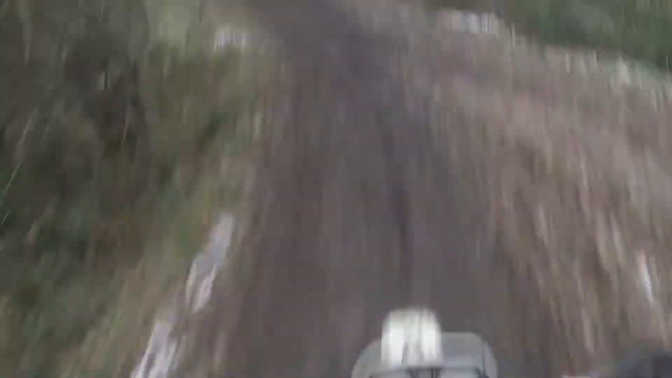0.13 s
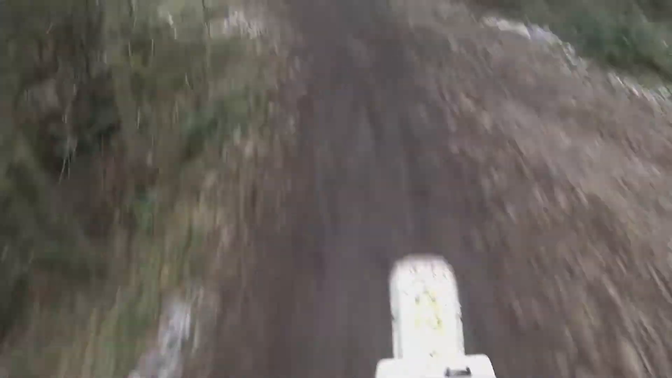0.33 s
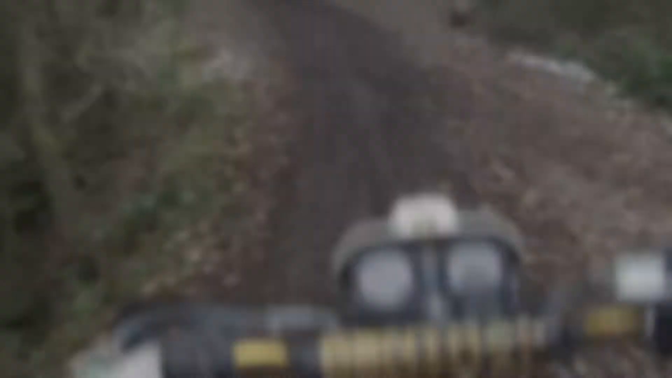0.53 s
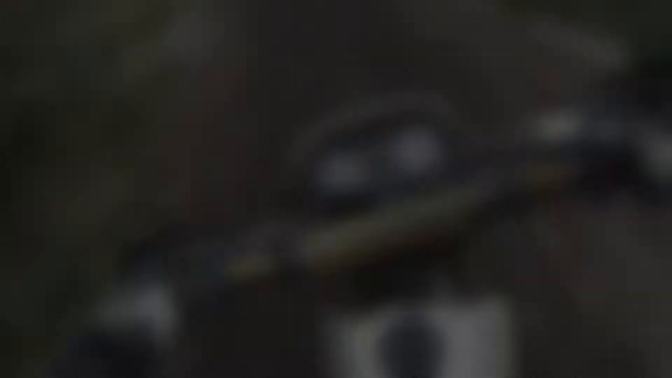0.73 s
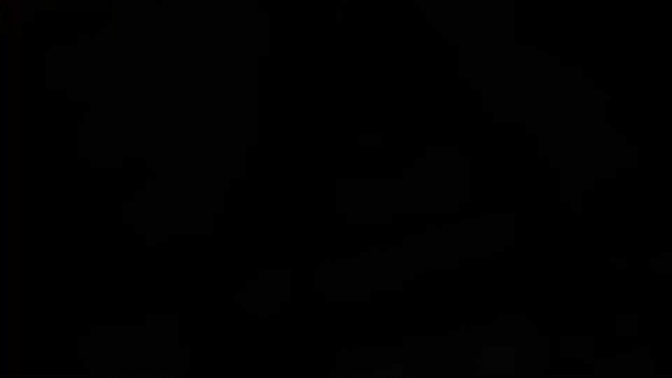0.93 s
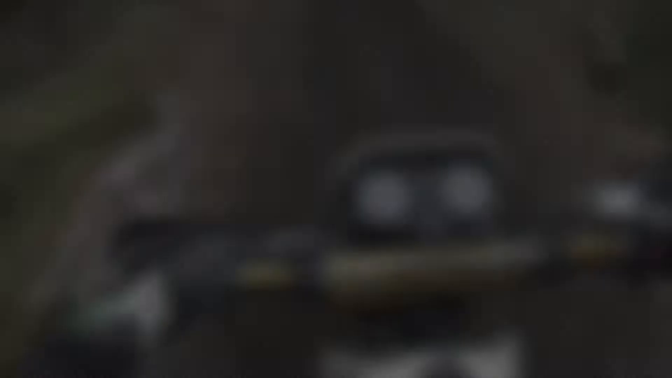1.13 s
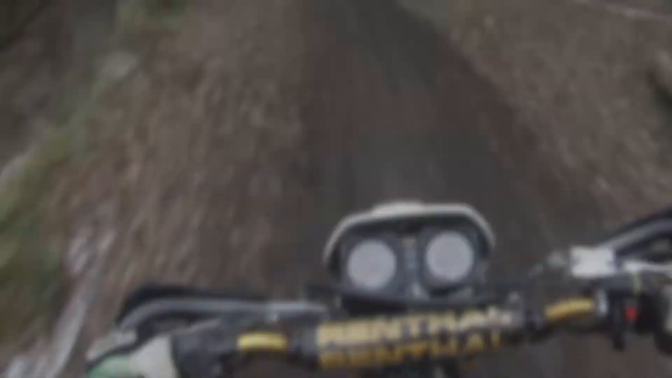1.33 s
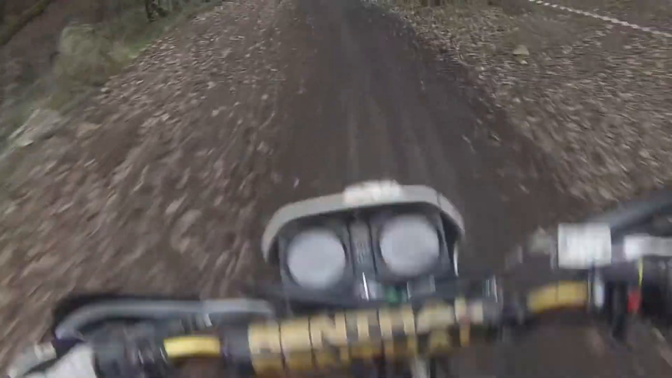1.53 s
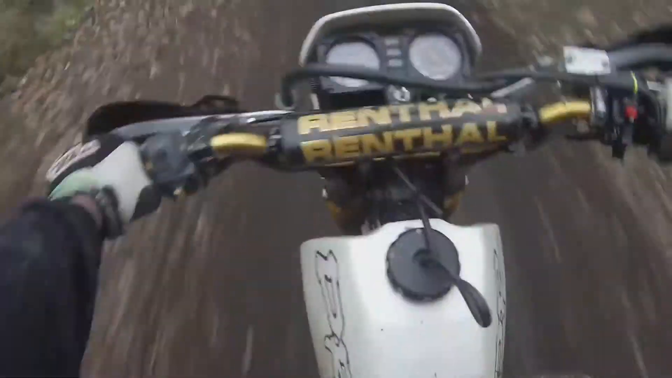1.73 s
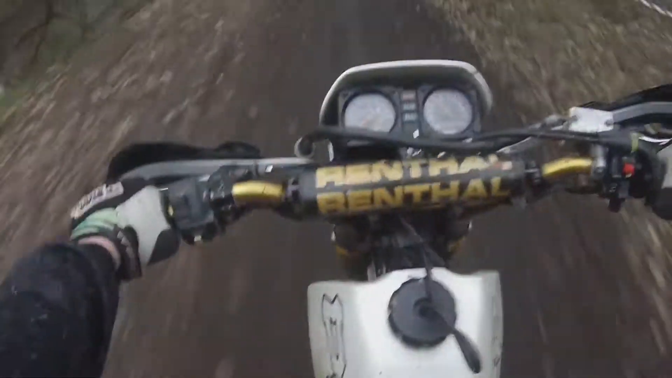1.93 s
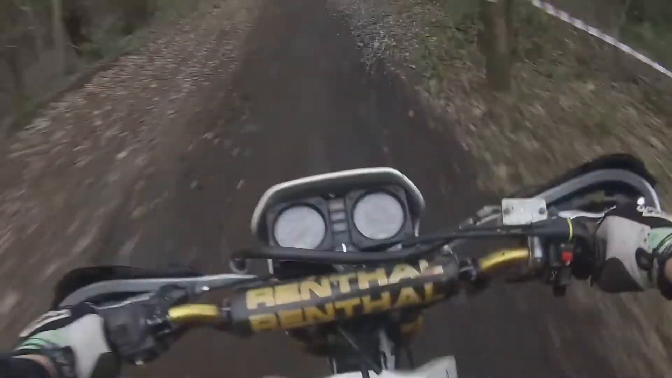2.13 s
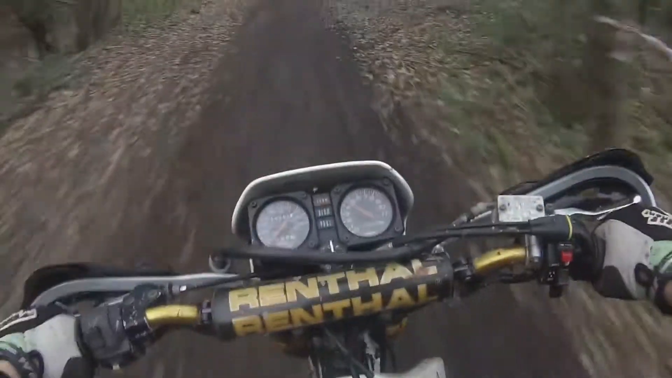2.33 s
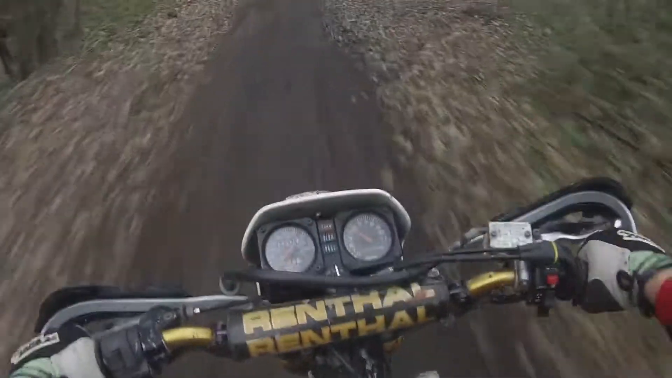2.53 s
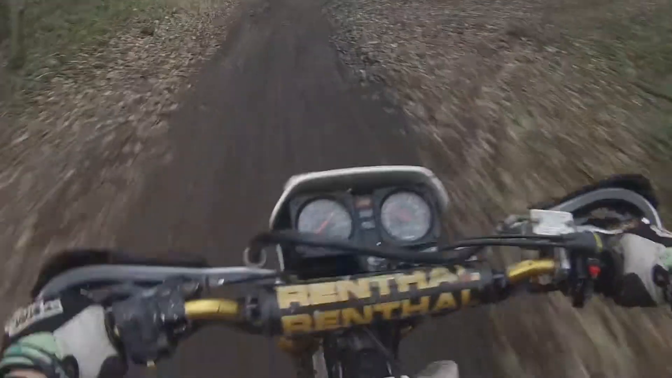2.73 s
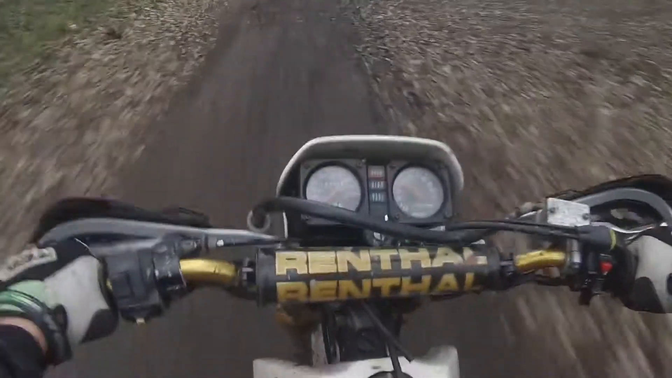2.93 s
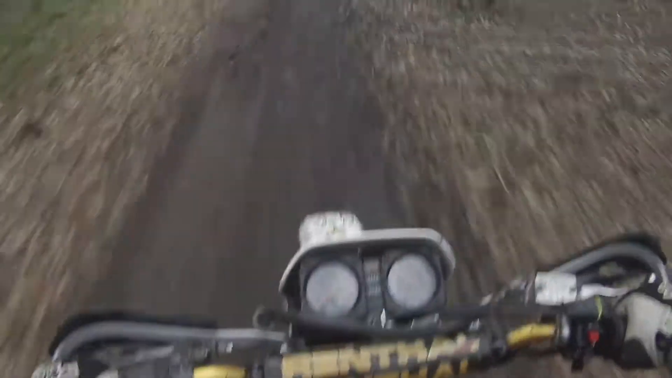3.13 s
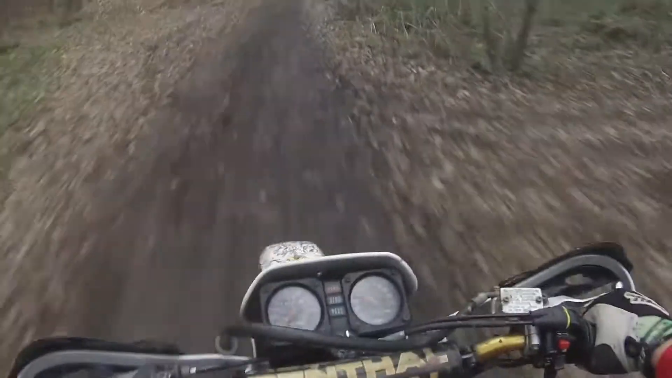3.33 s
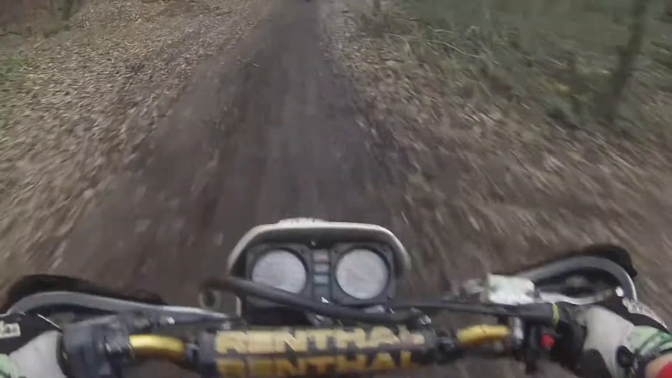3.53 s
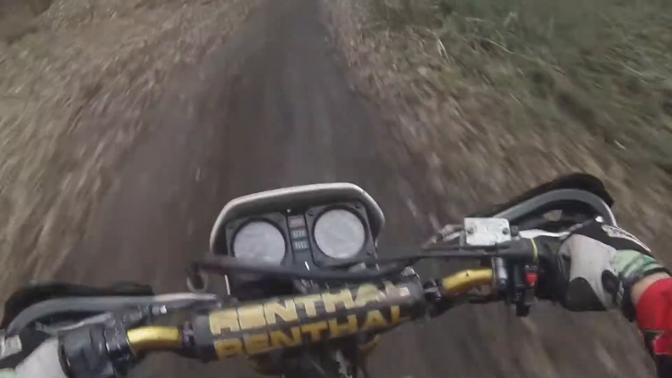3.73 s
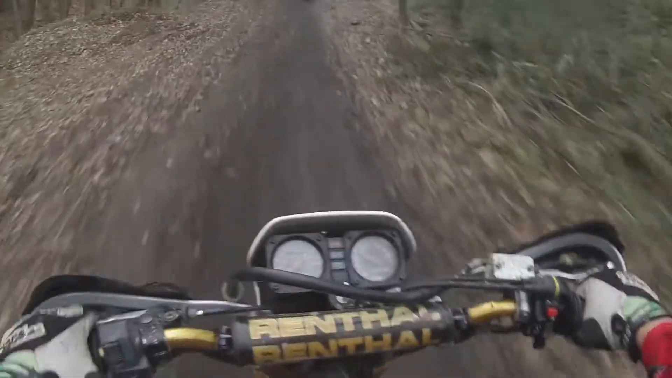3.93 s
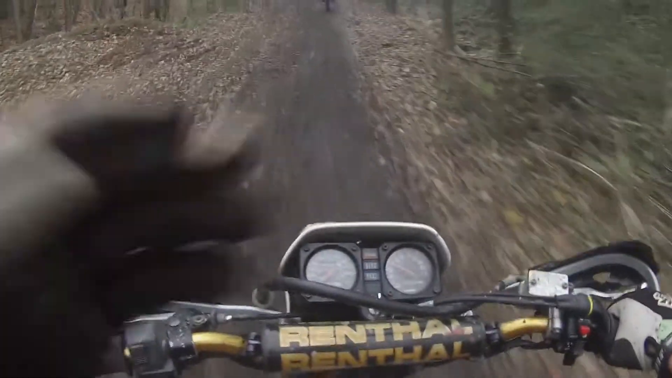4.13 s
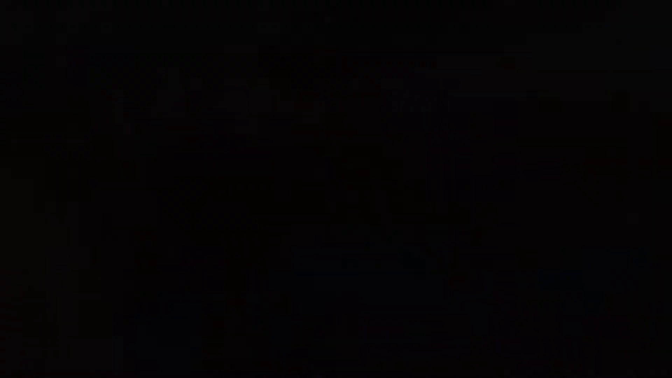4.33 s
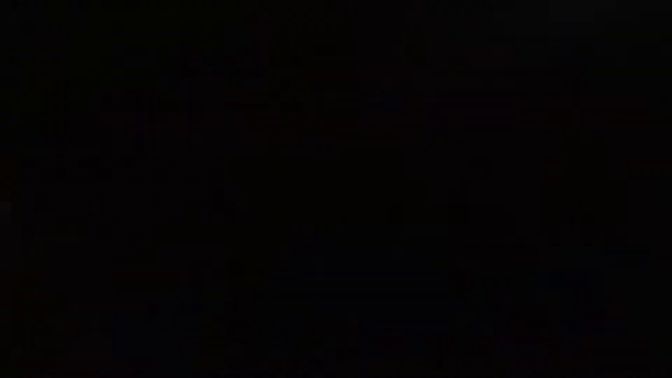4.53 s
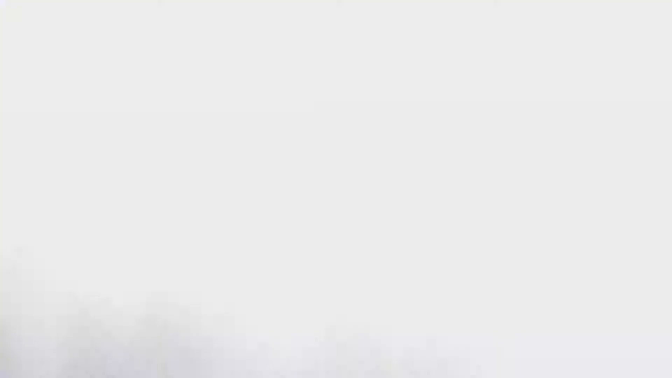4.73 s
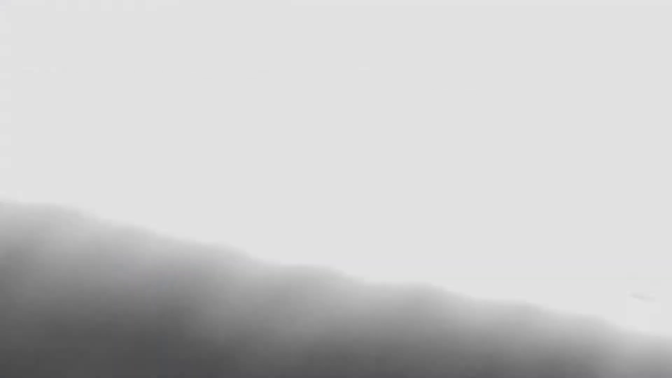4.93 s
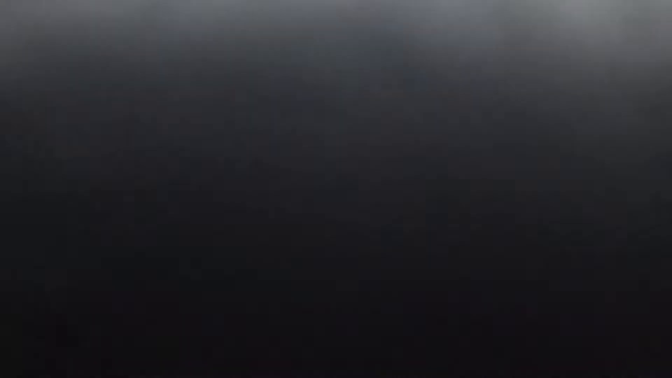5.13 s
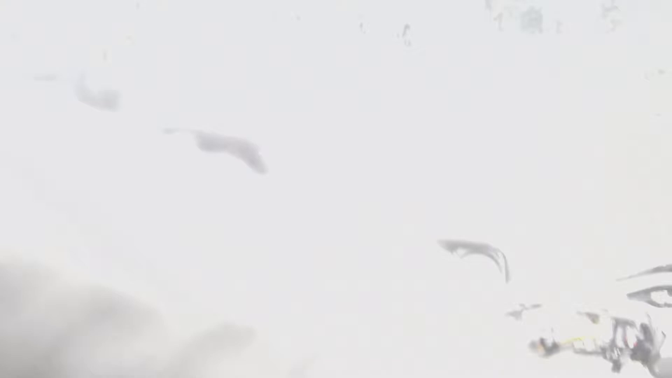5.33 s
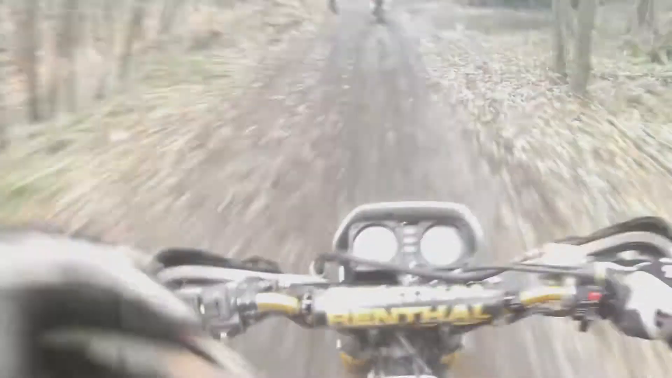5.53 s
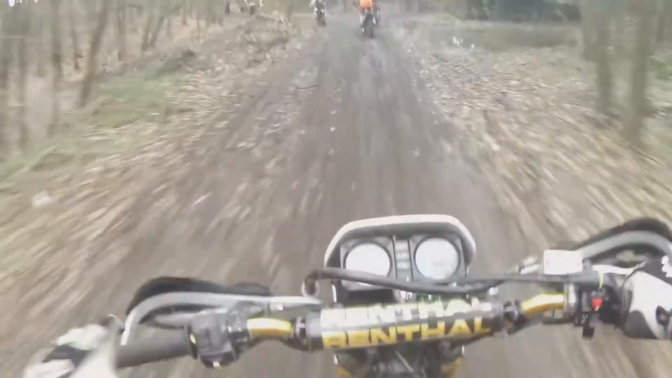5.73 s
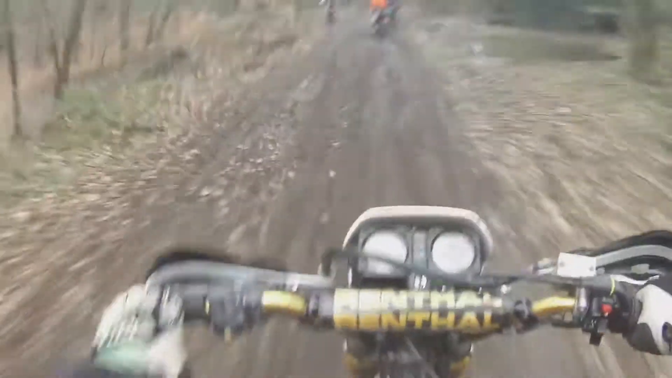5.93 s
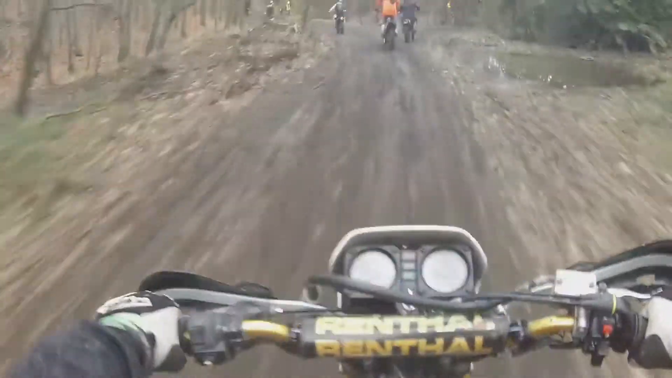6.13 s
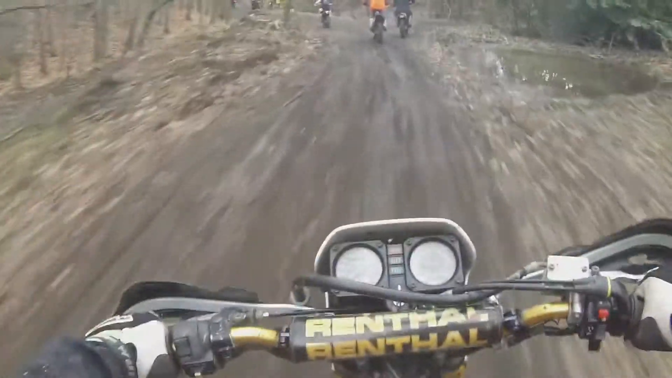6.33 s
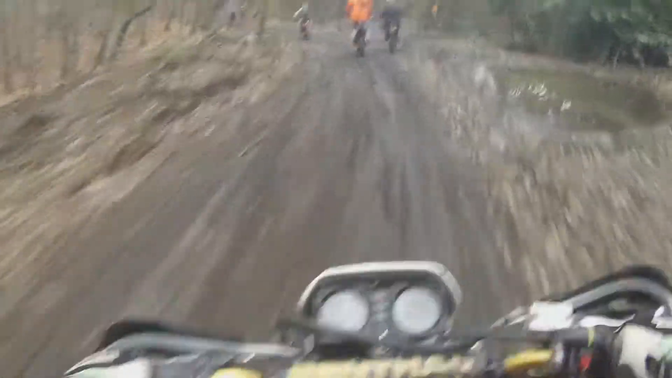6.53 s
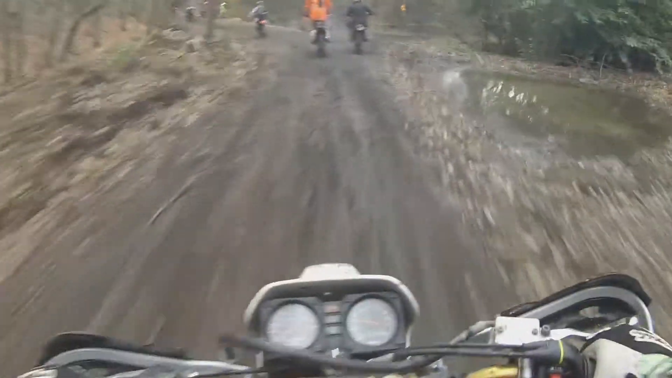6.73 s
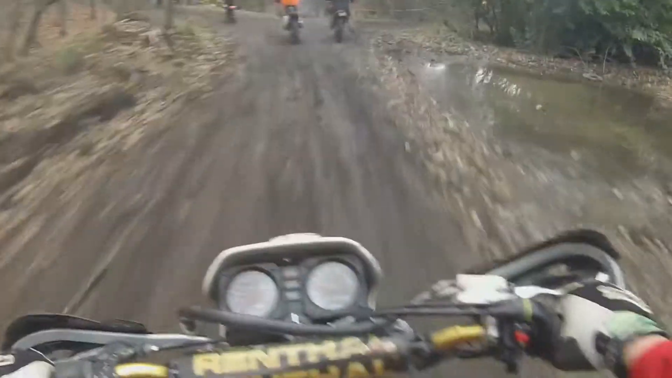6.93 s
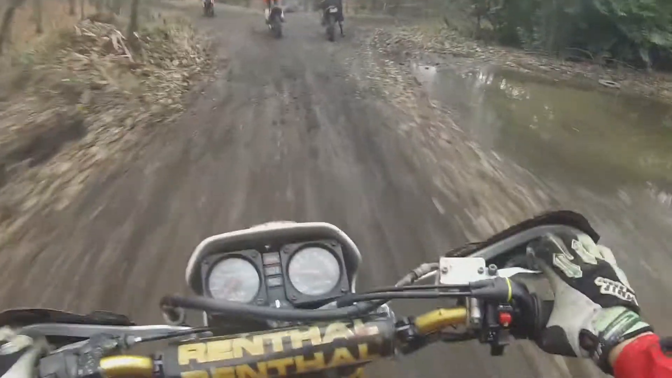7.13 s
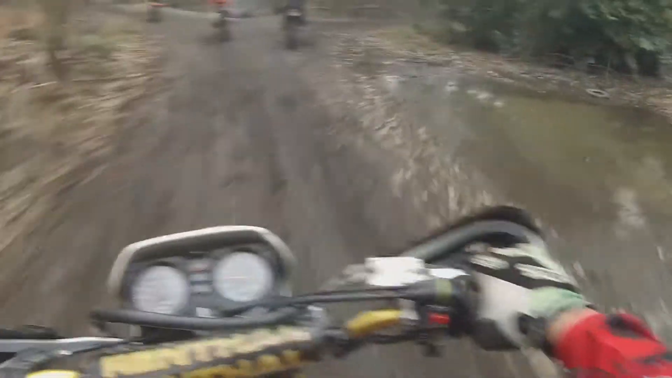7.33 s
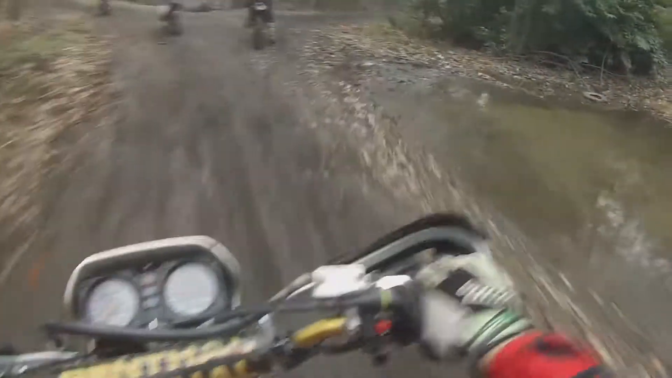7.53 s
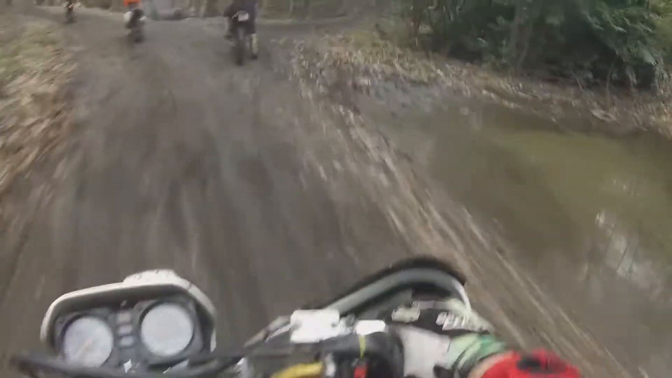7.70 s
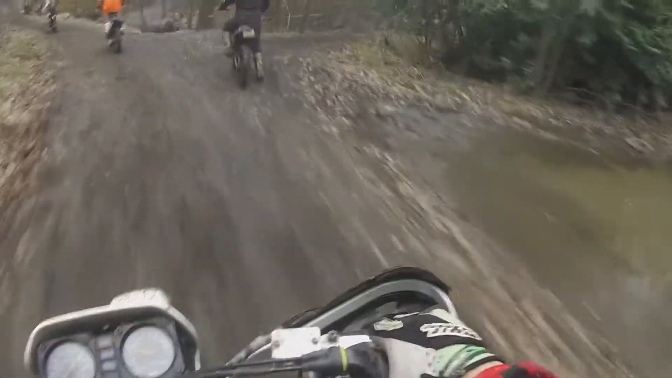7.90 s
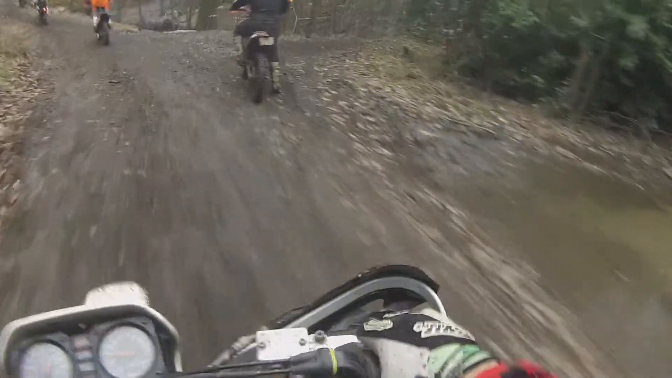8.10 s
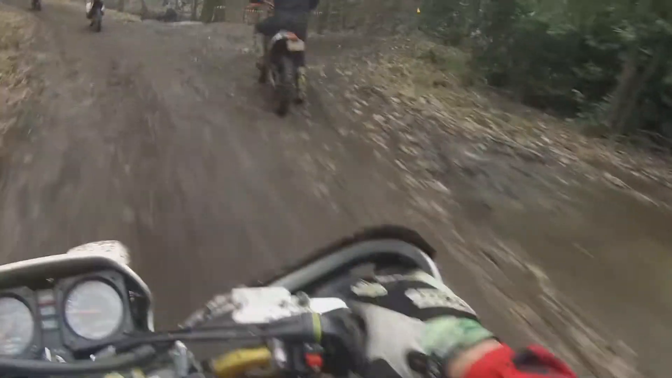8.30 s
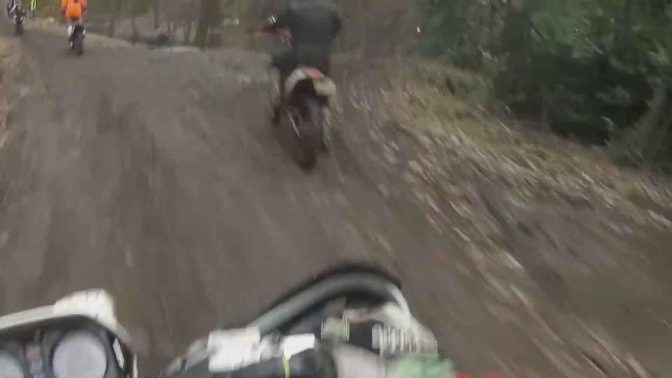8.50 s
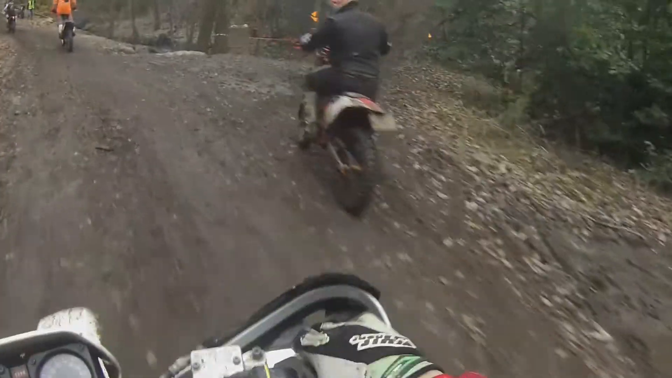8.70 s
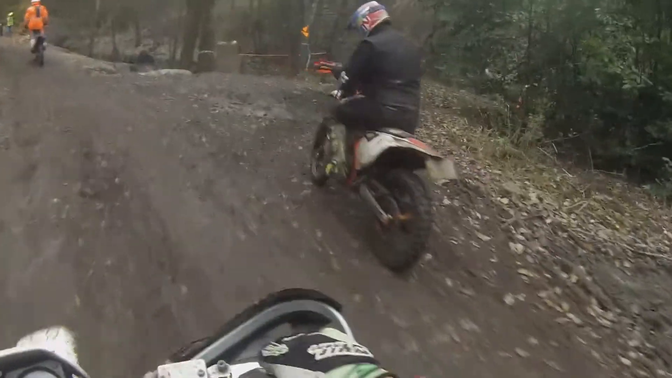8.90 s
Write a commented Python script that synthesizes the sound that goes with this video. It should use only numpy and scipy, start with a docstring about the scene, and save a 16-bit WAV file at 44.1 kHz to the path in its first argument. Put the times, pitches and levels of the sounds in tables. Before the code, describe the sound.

A rider-worn microphone on a woodland dirt track picks up a single-cylinder four-stroke trail bike close by. From 0 to 2.6 s the throttle opens in repeated bursts with a booming exhaust and barking intake, revs peaking around 1.6 s before dropping. Metallic ringing and valve clatter continue throughout, over gritty tyre hiss, low wind buffets, dry high chain chirps and occasional stone ticks, a clearer one near 2.75 s. From 2.6 s it coasts steadily. At about 4.33 and 4.42 s hard, near-overloading knocks strike the microphone housing, then cloth scrapes and zips across it until 5.5 s, with smaller bumps. A light throttle holds from 5 to 6.1 s, then revs sink until about 7.2 s and recover slightly. From 6.1 s a distant two-stroke drones faintly, rapping unevenly around 8 s; from 8.4 s a nearer one accelerates with a loud, rising, nasal rasp to the end at about 9 s.

```python
"""A dirt track between trees: a single-cylinder four-stroke trail bike, heard from a camera its rider wears.
The throttle opens in a few bursts, then the bike coasts; firings drive the pipes, knocks ring the metal.
Filtered noise makes tyres, wind and cloth; short falling tones make the chirping chain.
Midway the camera is knocked and rubbed by clothing; at the end two two-strokes ahead accelerate,
made of clicks for the drone and raps, and of harmonics for the rasp."""
import sys
import numpy as np
from scipy import signal
from scipy.fft import rfft, irfft
from scipy.io import wavfile
from scipy.ndimage import map_coordinates

SR = 44100
rng = np.random.default_rng(int(sys.argv[2]) if len(sys.argv) > 2 else 0)


def transcribe(signal):
    """Save signal, clipped to [-1, 1], as a 16-bit WAV file at the path in sys.argv[1]."""
    frames = np.atleast_2d(signal).T
    limited = np.clip(frames, -1, 1)
    pcm = np.round(limited * 32767).astype(np.int16)
    wavfile.write(sys.argv[1], SR, pcm)


N = 399546
TIME = np.arange(N) / SR
GRID_HZ = np.fft.rfftfreq(8192, 1 / SR)


def amp(db):
    """Turns decibels into a plain multiplier."""
    return 10 ** (np.asarray(db) / 20)


def evened(x):
    """Scales a sound to an rms of 1."""
    return x / np.sqrt(np.mean(x ** 2) + 1e-20)


def noise():
    """White noise as long as the scene."""
    return rng.standard_normal(N)


def curves(rows):
    """Joins the points of each table column by straight lines, one value per sample."""
    s, *columns = np.transpose(rows)
    return [np.interp(TIME, s, c) for c in columns]


def swells(rows):
    """Bell-shaped rises and dips in dB, one value per sample."""
    return sum(db * np.exp(-((TIME - s) / width) ** 2) for s, width, db in rows)


def add(mix, s, sound):
    """Adds a short sound to the mix at the given second."""
    part = mix[max(round(s * SR), 0):][:len(sound)]
    part += sound[:len(part)]


def wander(hz):
    """Smooth random drift with rms 1, mostly slower than the given rate."""
    low_pass = np.exp(-(np.fft.rfftfreq(N, 1 / SR) / hz) ** 2)
    return evened(irfft(rfft(noise()) * low_pass, N))


def shape(points):
    """Gain of a spectrum on the frequency grid."""
    hz, db = np.transpose(points)
    return amp(np.interp(np.log(GRID_HZ + 1), np.log(hz), db))


def peaks(modes):
    """Gain of a set of steep resonances on the frequency grid."""
    return sum(amp(db) / (1 + (2 * (GRID_HZ - hz) / width) ** 2) for hz, width, db in modes)


def colour(x, gain):
    """Filters with the given gain so that clicks ring only after they land; output rms is 1."""
    log_gain = np.log(np.maximum(np.r_[gain, gain[-2:0:-1]], 1e-5))
    # minimum phase: the filter answers as early as this gain allows
    response = np.exp(np.conj(signal.hilbert(log_gain)))
    taps = np.fft.ifft(response).real[:len(gain)]
    return evened(signal.oaconvolve(x, taps)[:N])


def pulses(turns, spread_db):
    """One click of uneven size at each whole turn, placed between samples."""
    at = np.flatnonzero(np.diff(np.floor(turns)) > 0)
    late = (np.floor(turns[at + 1]) - turns[at]) / (turns[at + 1] - turns[at])
    size = amp(spread_db * noise()[:len(at)])
    out = np.zeros(N)
    out[at] = size * (1 - late)
    out[at + 1] = size * late
    return out


def bursts(clicks, decay_s):
    """Each click starts a dying puff of noise."""
    envelope = signal.lfilter([1], [1, -np.exp(-1 / (decay_s * SR))], clicks)
    return evened(envelope * noise())


def snap(low_hz, high_hz, decay_s):
    """A short dying burst of noise in one band, about 1 at its start."""
    t = np.arange(SR // 10) / SR
    band = signal.butter(3, [low_hz, min(high_hz, SR / 2 - 1)], "band", fs=SR, output="sos")
    return evened(signal.sosfilt(band, rng.standard_normal(len(t)))) * np.exp(-t / decay_s)


def chamber(x, round_trip_s, echo):
    """Echoes inside a silencer chamber spread each pulse in time without colouring it."""
    delay = np.exp(-2j * np.pi * np.fft.rfftfreq(N, 1 / SR) * round_trip_s)
    return irfft(rfft(x) * (delay - echo) / (1 - echo * delay), N)


def resonate(x, hz, width):
    """A resonance of gain 1 that follows the curve hz."""
    turn = np.exp(2j * np.pi * np.cumsum(hz) / SR)
    r = np.exp(-np.pi * width / SR)
    return 2 * (turn * signal.lfilter([1 - r], [1, -r], x / turn)).real


def wavering(x, share, hz):
    """Lets the pitch of a ringing sound drift up and down by the given typical share."""
    lag = wander(hz)
    places = np.arange(N) + share * lag / np.std(np.diff(lag))
    return map_coordinates(x, [places], order=3, mode="nearest")


# hiss of tyres and chain, following the road speed: (time [s], level [dB])
ROLLING = [(0.0, -48), (1.2, -47.5), (1.62, -42.5), (1.9, -46.5), (3.0, -48), (5.7, -55.5), (6.6, -53),
           (7.15, -53), (8.0, -51)]
# spectra of the hiss, the road rumble and the wind: (frequency [Hz], relative level [dB per Hz])
HISS_SPECTRUM = [(200, -37), (1000, 0.5), (3000, 20), (4400, 4.5), (5500, 12), (6700, 8), (8500, 8.5),
                 (10200, 4.5), (12000, -2.5), (12700, -26), (14200, -28), (15300, -15)]
ROAD_SPECTRUM = [(20, 3), (60, -5.5), (120, -2.5), (280, -3), (450, -9), (800, -17), (1200, -16),
                 (3000, -35)]
GUST_SPECTRUM = [(8, -3.5), (28, 3), (50, -9.5), (90, -14.5), (200, -23.5), (1000, -75)]
# gusts on the camera: (time [s], half-width [s], rise above the steady wind [dB])
BUFFETS = [(0.28, 0.13, 22.5), (0.71, 0.082, 21), (2.7, 0.37, 10), (3.6, 0.26, 12.5), (4.3, 0.088, 4)]
WIND_DB, WIND_PER_ROLLING = -58.5, 0.64  # wind at the starting speed; dB it gains per dB of tyre hiss


def track():
    """Tyres rumble and hiss with grit, and wind buffets the camera: three filtered noises."""
    hiss_db, = curves(ROLLING)
    speed_db = hiss_db - hiss_db[0]
    grit = noise() * amp(2.4 * wander(250) + 1.6 * wander(30))
    hiss = amp(hiss_db - 0.33) * colour(grit, shape(HISS_SPECTRUM))  # just below the table
    rumble_db = -47.5 + 0.45 * speed_db + wander(31)
    rumble = amp(rumble_db) * colour(noise(), shape(ROAD_SPECTRUM))
    wind_db = WIND_DB + WIND_PER_ROLLING * speed_db + swells(BUFFETS)
    wind = amp(wind_db) * colour(noise(), shape(GUST_SPECTRUM))
    return hiss + rumble + wind


# spectrum of grit spraying against the metal: (frequency [Hz], relative level [dB per Hz])
SPRAY_SPECTRUM = [(3000, -37), (6000, -5), (9000, -12), (13000, 9), (15000, -13)]
SPRAY_DB, SPRAY_PER_S = -71, 27  # level at the starting speed; grains per second on average


def spray():
    """Grains thrown up by the front tyre tick brightly against the metal, at random moments."""
    hiss_db, = curves(ROLLING)
    sizes = amp(4 * np.clip(noise(), -2, 2))
    grains = (rng.random(N) < SPRAY_PER_S / SR) * sizes
    spray_db = SPRAY_DB + hiss_db - hiss_db[0]
    return amp(spray_db) * colour(bursts(grains, decay_s=.003), shape(SPRAY_SPECTRUM))


def scattered(x):
    """Trunks and banks add many faint echoes."""
    t = np.arange(SR // 5) / SR
    taps = rng.standard_normal(len(t)) * (rng.random(len(t)) < .04) * np.exp(-t / .02)
    echoes = signal.oaconvolve(x, taps / np.linalg.norm(taps))[:N]
    return evened(x + .18 * echoes)


# engine speeds of the two bikes ahead: (time [s], crank speed [turns per second])
FAR_REVS = [(6.08, 92), (6.35, 105), (6.52, 113), (6.62, 122), (6.8, 129), (7.05, 124), (7.6, 119),
            (7.72, 128), (7.94, 126), (8.04, 121.6), (8.25, 118), (8.34, 116.6), (8.45, 120), (8.63, 142),
            (8.8, 148), (9.06, 146)]
NEAR_REVS = [(8.4, 144), (8.52, 156), (8.65, 166), (8.71, 170.7), (8.76, 168.6), (8.81, 165), (8.85, 167.5),
             (8.89, 173.5), (8.97, 176), (9.06, 180.3)]
# their exhausts: (time [s], drone before a 7.5 dB cut [dB], raps [dB], rasp [dB])
FAR_BIKE = [(6.08, -60, -75, -73), (6.5, -49, -72, -56), (6.62, -68, -72, -70), (6.8, -53, -74, -66),
            (7.05, -70, -75, -75), (7.6, -52, -71, -71), (7.72, -48.5, -51, -60), (7.95, -49.5, -52.5, -54),
            (8.01, -46.5, -45.5, -47), (8.165, -43, -43, -51), (8.2, -49, -46, -52),
            (8.255, -44, -44.5, -53), (8.285, -46, -46.5, -41), (8.43, -41, -45, -40.5),
            (8.63, -51, -40.5, -46), (8.8, -50, -47, -42), (9.06, -69, -63, -42)]
NEAR_BIKE = [(8.42, -52, -64, -51), (8.48, -45, -37, -45), (8.62, -44.5, -47, -38), (8.72, -37, -43, -37.5),
             (8.78, -39, -44, -35), (8.9, -38, -50, -37), (8.98, -38, -59, -39.5), (9.06, -37, -54, -39)]
# resonances of their silencers: (frequency [Hz], width [Hz], relative level [dB])
FAR_SILENCER = [(1200, 220, -27), (1680, 170, -11), (1990, 110, -6.5), (2370, 120, -9), (2630, 99, -6),
                (2975, 200, -2), (3620, 270, -15), (4340, 300, -20)]
NEAR_SILENCER = [(1030, 110, -7), (1630, 140, 3), (1870, 190, 0), (2300, 150, -7), (2640, 150, -6),
                 (2990, 130, 1), (3150, 90, 1), (3580, 220, -8), (4400, 300, -17), (6240, 1600, -25)]
# resonances that take over as a two-stroke comes on song: (frequency [Hz], width [Hz], relative level [dB])
ON_SONG = [(1060, 110, -5), (1590, 130, 2), (1940, 190, 3), (2310, 100, 5), (2650, 130, -3), (3020, 130, 2),
           (3150, 90, -2), (3580, 300, -9), (4400, 330, -9), (6200, 1500, -19)]
SONG_FROM_RATE, SONG_FULL_RATE = 169, 175  # crank turns per second
# spectra of the drone and the raps: (frequency [Hz], relative level [dB per Hz])
DRONE_SPECTRUM = [(60, -39), (105, -27), (135, -7), (170, 0), (245, 6.5), (350, -3), (430, -22),
                  (520, -17.5), (690, -16.5), (900, -30), (1500, -41)]
RAPS_SPECTRUM = [(200, -39), (750, -15), (1050, -3.5), (1300, -1), (1550, -0.5), (1850, 5.5), (2400, 0),
                 (3100, -1), (3900, -10), (4800, -19), (6000, -12), (8000, -39), (14000, -42)]
# each harmonic swells and fades as the echoes off the trees shift
FADE_DB, FADE_HZ = 3, 14  # typical size; new random values per second


def bike_ahead(revs, levels, silencer, rough):
    """A two-stroke exhaust: low drone, uneven raps, and harmonics lit up by the silencer's resonances."""
    rate, = curves(revs)
    drone_db, raps_db, rasp_db = curves(levels)
    turns = np.cumsum(rate * (1 + .0012 * wander(40) + .0012 * wander(12))) / SR
    beat = pulses(turns, spread_db=.9)
    # when every second firing fails, the next one goes off hard
    hard = pulses(turns / 2, spread_db=1.6)
    drone = colour(beat + rough * hard, shape(DRONE_SPECTRUM))
    crack = evened(chamber(chamber(hard, .0007, echo=.6), .0011, echo=.45))
    raps = colour(crack + .35 * bursts(hard, decay_s=.0015), shape(RAPS_SPECTRUM))

    on = TIME > levels[0][0]
    gain, song_gain = peaks(silencer), peaks(ON_SONG)
    song = np.clip((rate[on] - SONG_FROM_RATE) / (SONG_FULL_RATE - SONG_FROM_RATE), 0, 1)
    lines = np.zeros(N)
    for k in range(5, 40):  # harmonics of the crank speed
        fade = np.interp(TIME[on] * FADE_HZ, np.arange(200), rng.standard_normal(200))
        plain_size = np.interp(k * rate[on], GRID_HZ, gain)
        song_size = np.interp(k * rate[on], GRID_HZ, song_gain)
        size = (1 - song) * plain_size + song * song_size
        lines[on] += size * amp(FADE_DB * fade) * np.cos(2 * np.pi * (k * turns[on] + rng.random()))
    lines[on] = evened(lines[on])
    rasp = lines + rough * colour(bursts(beat, decay_s=.003), gain)

    entry = np.clip((TIME - levels[0][0]) / 0.05, 0, 1)
    return entry * (amp(drone_db - 7.5) * drone + amp(raps_db) * scattered(raps) + amp(rasp_db) * rasp)


# fibres snag this often, and this strongly beside the smooth scrape
SNAGS_PER_S, SNAG_SHARE = 170, .6


def snagging():
    """Friction noise of cloth, with single fibres catching and letting go."""
    sizes = amp(4 * np.clip(noise(), -2, 2))
    snags = (rng.random(N) < SNAGS_PER_S / SR) * sizes
    smooth = noise() * amp(1.15 * wander(300) + 0.98 * wander(33))
    return smooth + SNAG_SHARE * bursts(snags, decay_s=.0012)


# strokes of cloth over the camera: (start [s], end [s], level [dB], brightness [0-1],
# push on the housing [dB], pitch of the zipping weave [Hz])
RUBS = [(4.326, 4.387, -33.5, 0.65, -17, 2420), (4.383, 4.438, -36, 0.7, -28, 6900),
        (4.438, 4.511, -35.5, 0.7, -28, 2770), (4.55, 4.592, -39, 0.27, -37, 2740),
        (4.593, 4.861, -32.5, 0.3, -32, 2610), (4.656, 4.82, -36.5, 1, -48, 2650),
        (4.8, 4.914, -48, 0.8, -50, 1950), (4.805, 4.961, -33, 0.26, -38.5, 2620),
        (4.986, 5.051, -42.5, 0.25, -37, 2710), (5.1, 5.198, -43, 0, -46, 1240),
        (5.2, 5.325, -42.5, 0.12, -40, 1130), (5.3, 5.396, -37, 0.6, -37, 2690),
        (5.377, 5.503, -39, 0.27, -46, 2400)]
# spectra of dull and bright strokes: (frequency [Hz], relative level [dB per Hz])
SCRAPE_SPECTRUM = [(180, -8.5), (400, -5), (700, -14.5), (1150, -6.5), (1700, 1.5), (2200, 0), (2600, 2),
                   (3200, -7), (3700, -6.5), (5000, -9), (6500, -19), (15000, -32)]
SQUEAL_SPECTRUM = [(800, -31), (2000, 2), (2700, 6.5), (3600, -5.5), (4600, -0.5), (6400, -8), (8100, -2),
                   (10000, -11.5), (12000, -9), (15000, -25)]
# the two thread directions of the weave: (pitch ratio, relative level [dB])
WEAVE = [(1, 0.5), (1.29, -5)]
# zipping tone: level beside the scrape, width, typical unsteadiness of its pitch as a share
ZIP_DB, ZIP_WIDTH_HZ, ZIP_WAVER = -5.5, 85, 0.04


def cloth():
    """Each stroke scrapes over the housing and pushes it about; the weave zips in wavering streaks."""
    dull = colour(snagging(), shape(SCRAPE_SPECTRUM))
    bright = colour(snagging(), shape(SQUEAL_SPECTRUM))
    push = colour(noise(), shape(GUST_SPECTRUM))
    threads = [(noise(), ratio * (1 + ZIP_WAVER * wander(22)), amp(db + 3 * wander(30)))
               for ratio, db in WEAVE]
    out = np.zeros(N)
    for start, end, db, share, push_db, zip_hz in RUBS:
        on = (TIME > start) & (TIME < end)
        nearest_end_s = np.minimum(TIME[on] - start, end - TIME[on])
        contact = np.clip(nearest_end_s / (0.2 * abs(end - start) + 1e-4), 0, 1)
        share = np.clip(share, 0, 1)
        zipping = evened(sum(grip[on] * resonate(x[on], zip_hz * pitch[on], ZIP_WIDTH_HZ)
                             for x, pitch, grip in threads))
        rubbing = np.sqrt(1 - share) * dull[on] + np.sqrt(share) * bright[on]
        scrape = evened(rubbing + amp(ZIP_DB) * zipping)
        out[on] += contact * (amp(db) * scrape + amp(push_db) * push[on])
    return out


# blows on the camera housing: (time [s], level [dB], pitch [Hz], swell time, strongest at half of it [s])
THUMPS = [(4.3347, 0, 55, 0.0036), (4.347, -1, 70, 0.0072), (4.4198, -2, 66.6, 0.01),
          (4.452, -24, 65, 0.038), (4.722, -20, 27.8, 0.028), (4.77, -15.5, 36, 0.013),
          (4.785, -15, 114, 0.0037), (4.808, -24, 62.4, 0.016), (5.221, -21, 55.5, 0.0077),
          (5.494, -26.5, 79, 0.0071), (7.238, -38.5, 76.6, 0.019)]
# the housing cracks as it is struck: (time [s], level [dB], upper edge of the noise [Hz], decay time [s])
CRACKS = [(4.331, -28, 5000, 0.0021), (4.3434, -22.5, 2980, 0.0062), (4.347, -15.5, 3540, 0.0038),
          (4.42, -18.5, 3100, 0.0027), (4.927, -38, 4500, 0.003), (5.03, -36, 2980, 0.0028),
          (5.362, -36, 4500, 0.0044)]
# what the housing rings with: (frequency [Hz], level beside the crack [dB], decay time [s])
HOUSING = [(390, 1.5, 0.0013), (646, -10.5, 0.0028), (1020, -4, 0.0023), (2210, -1, 0.0022)]


def handling():
    """Blows on the camera housing: low swinging thumps, and noise cracks that make it ring."""
    out, t = np.zeros(N), np.arange(SR // 4) / SR
    for s, db, hz, swell_s in THUMPS:
        # the padded mount takes up the blow, swings briefly and stops
        swell = 2 * t / swell_s * np.exp(1 - 2 * t / swell_s)
        add(out, s, amp(db) * swell * np.sin(2 * np.pi * hz * t))
    ring = sum(amp(db) * np.sin(2 * np.pi * hz * t) * np.exp(-t / decay_s) for hz, db, decay_s in HOUSING)
    for s, db, bright_hz, decay_s in CRACKS:
        add(out, s, amp(db) * snap(low_hz=895, high_hz=bright_hz, decay_s=decay_s))
        add(out, s, amp(db) * ring)
    return out


# stones and loose parts tick against the bike: (time [s], level before a 16 dB cut [dB])
TICKS = [(0.396, -27), (0.7084, -25), (2.667, -27), (2.757, -18), (7.475, -32), (7.682, -33), (7.722, -34),
         (7.746, -29), (7.7834, -29), (8.162, -38), (8.399, -41)]
# resonances of the engine casing: (frequency [Hz], width [Hz], relative level [dB])
CASING = [(1538, 67, -8.5), (1614, 54, -1), (1698, 130, -11)]
STONE_RING_DB, STONE_RING_S = 8.5, 0.0076  # casing ring beside each tick: level, decay time


def stones():
    """Sharp noise ticks on the frame and mudguard; each also rings the engine casing."""
    out, t = np.zeros(N), np.arange(SR // 10) / SR
    ring = np.sin(2 * np.pi * CASING[1][0] * t) * np.exp(-t / STONE_RING_S)
    for s, db in TICKS:
        tick = snap(low_hz=1030, high_hz=8600, decay_s=0.0074)
        add(out, s, amp(db - 16) * (tick + amp(STONE_RING_DB) * ring))
    return out


# spells in which the chain chirps: (start [s], end [s], typical peak level [dB])
CHIRPS = [(0.05, 0.75, -53), (1.87, 3.8, -56.5), (4.05, 5.25, -56.5), (6.2, 7.66, -53)]
# a dry link comes round this often and chirps only some of the time
CHIRP_GAP_S, CHIRP_CHANCE = .087, .8


def chain():
    """Dry links give short, rough, slightly falling chirps as they come round."""
    out, t = np.zeros(N), np.arange(0, .02, 1 / SR)
    passes = np.arange(0, N / SR, CHIRP_GAP_S)
    chances = rng.standard_normal((len(passes), 3))
    lucks = rng.random(len(passes))
    for s, (pitch, size, late), luck in zip(passes, chances, lucks):
        hz = 8400 * (1 + .008 * pitch - 2.25 * t) + 600 * rng.standard_normal(len(t))
        chirp = np.hanning(len(t)) * np.sin(2 * np.pi * np.cumsum(hz) / SR)
        for start, end, db in CHIRPS:
            if start <= s <= end and luck < CHIRP_CHANCE:
                add(out, s + 0.016 * late, amp(db + 1.7 * size) * chirp)
    return out


# twists of the throttle: (start [s], start of shutting [s], opening [0-1])
THROTTLE = [(0.138, 0.327, 0.59), (0.473, 0.63, 0.78), (0.782, 1.585, 0.84), (1.842, 1.994, 0.92),
            (2.002, 2.18, 0.94), (2.203, 2.424, 0.52), (2.397, 2.618, 0.8), (4.998, 6.14, 0.31)]
OPEN_S, SHUT_S = 0.05, 0.08  # time of a full opening ramp and a full shutting ramp


def throttle():
    """Opening of the throttle: each twist opens, holds and shuts."""
    twists = []
    for start, end, opening in THROTTLE:
        ramps = np.minimum((TIME - start) / OPEN_S, 1 - (TIME - end) / SHUT_S)
        twists.append(opening * np.clip(ramps, 0, 1))
    return np.max(twists, axis=0)


CRUISE_RATE = 33  # firings per second


def level_db(law, rate, opening):
    """Level of an engine part, following the revs and the throttle."""
    cruise_db, octave_db, throttle_db = law
    return cruise_db + octave_db * np.log2(rate / CRUISE_RATE) + throttle_db * opening


# boom of the exhaust as its gas heats and cools: (time [s], frequency [Hz])
PIPE = [(0, 268), (1.42, 257.5), (1.6, 269), (2.0, 256), (5.6, 283), (6.1, 283), (7, 238)]
# spectrum of the exhaust: (frequency [Hz], relative level [dB per Hz])
EXHAUST_SPECTRUM = [(25, -36), (42, -31), (80, 3.5), (100, 0.5), (122, -12), (165, -5.5), (250, -9.5),
                    (330, -7.5), (430, -4.5), (560, -15), (820, -24.5), (5000, -43)]
# resonances of the airbox: (frequency [Hz], width [Hz], relative level [dB])
INTAKE = [(437, 92, 4.5), (525, 40, 1.5), (667, 124, 4)]
SING_DB, SING_WIDTH_HZ = 10.5, 61  # gain of the singing tone and the range in which it is excited


def pipes(firing, rate, exhaust_db, intake_db):
    """Firings boom in the exhaust, which sings as harmonic 6 meets its resonance; the airbox barks."""
    muffled = chamber(chamber(firing, .0037, echo=.6), .0083, echo=.65)
    pipe = colour(muffled, shape(EXHAUST_SPECTRUM))
    pipe_hz, = curves(PIPE)
    boom = evened(resonate(pipe, pipe_hz, width=30))
    sixth_hz = 6 * rate
    closeness = 1 / (1 + (2 * (sixth_hz - pipe_hz) / SING_WIDTH_HZ) ** 2)
    sing = resonate(pipe, sixth_hz, width=16) * closeness
    exhaust = evened(.65 * pipe + 0.76 * boom) + amp(SING_DB) * sing
    gulp = evened(chamber(firing, .0016, echo=.75)) + .15 * bursts(firing, decay_s=.006)
    bark = colour(gulp, peaks(INTAKE) / (1 + (GRID_HZ / 840) ** 12))
    return amp(exhaust_db - 1.6) * exhaust + amp(intake_db - 7.5) * bark


# own engine: (time [s], speed [firings per second])
REVS = [(0.0, 32.37), (0.5, 33.67), (0.68, 36.91), (0.77, 31.5), (0.9, 35.61), (1.09, 42.15), (1.21, 38.05),
        (1.33, 41.07), (1.43, 41.27), (1.6, 51.64), (1.87, 35.34), (2.05, 33.5), (2.26, 36.11),
        (2.34, 34.49), (2.48, 35.01), (2.63, 38.27), (2.95, 32.9), (3.6, 33.2), (4.3, 30.1), (5.5, 27.4),
        (5.9, 28.9), (6.15, 29.6), (6.4, 27), (7.2, 23.5), (7.6, 24.6), (8.1, 29.3)]
# level laws: (coasting at the cruising rate [dB], per octave of revs [dB], added by full throttle [dB])
# the pipes play the exhaust 1.6 dB and the intake 7.5 dB below their laws
EXHAUST_LAW = (-54, 9.8, 13.6)
INTAKE_LAW = (-65.5, -2, 28.6)
RING_LAW = (-41.5, 34, 1)
CLATTER_LAW = (-48, 4.8, 2.55)
# the casing's ring and the piston hum swell or sink: (time [s], half-width [s], change [dB])
RING_SWELLS = [(0.0, 0.15, -10), (0.33, 0.047, 7.5), (0.46, 0.19, -7.5), (0.68, 0.049, 4), (0.81, 0.14, -5),
               (1.3, 0.064, 2.5), (1.57, 0.026, 3), (1.78, 0.027, 8.5), (2.0, 0.3, -5.5), (2.85, 0.057, -7),
               (3.22, 0.075, 5), (4.4, 0.39, 2), (5.57, 0.11, -3.5), (6.95, 0.39, 3), (7.8, 0.17, 7.5)]
HUM_SWELLS = [(0.2, 0.8, -2.5), (2.3, 0.44, 4.5), (6.8, 0.56, -3), (8.6, 0.42, -5)]
# knocks in one engine cycle, piston first, then valves: (place in the cycle [0-1], relative level [dB])
KNOCKS = [(0.023, 1), (.3, 5), (0.559, -2), (0.761, 3.5)]
# resonances of the thin metal: (frequency [Hz], width [Hz], relative level [dB])
METAL = [(2514, 190, -1), (3002, 185, 2.5), (3620, 340, 1), (4590, 85, -5), (5220, 113, -3),
         (5550, 440, -15.5), (7330, 140, -3.5)]
# spectrum added under them: (frequency [Hz], relative level [dB per Hz])
CLATTER_SPECTRUM = [(100, -8.5), (800, -8.5), (1150, -10.5), (1400, 3.5), (2000, 4), (2400, -15),
                    (3900, -8.5), (4300, -16), (8000, -20), (11500, -16.5), (15000, -29)]
# above these firings per second the exhaust and the clatter grow faster
PULLING_RATE, PULLING_DB_PER_OCTAVE = 47.3, 12
STRAIN_RATE, STRAIN_DB_PER_OCTAVE = 33.6, 9.5
RING_LEAST_RATE, RING_FULL_RATE = 28.2, 34.96  # the ring follows the revs only between these
RING_DRIFT, RING_DRIFT_HZ = .011, 27  # the casing's pitch wavers by this typical share, about this fast
INTAKE_CURVE = 0.62  # the airbox barks already at part throttle: power of the opening


def engine():
    """Firings drive the pipes; piston and valve knocks ring the casing and the thin metal."""
    rate, = curves(REVS)
    opening = throttle()
    exhaust_db = level_db(EXHAUST_LAW, rate, opening)
    exhaust_db = exhaust_db + PULLING_DB_PER_OCTAVE * np.log2(np.maximum(rate / PULLING_RATE, 1))
    intake_db = level_db(INTAKE_LAW, rate, opening ** INTAKE_CURVE)
    ring_rate = np.clip(rate, RING_LEAST_RATE, RING_FULL_RATE)
    ring_db = level_db(RING_LAW, ring_rate, opening) + swells(RING_SWELLS)
    strain_db = STRAIN_DB_PER_OCTAVE * np.log2(np.maximum(rate / STRAIN_RATE, 1))
    clatter_db = level_db(CLATTER_LAW, rate, opening) + strain_db

    turns = np.cumsum(rate * (1 + .001 * wander(25))) / SR  # engine cycles, one firing in each
    firing = pulses(turns, spread_db=.4)
    load = np.clip((exhaust_db + 48) / 12, 0, 1)
    # the piston's inertia hums at twice the crank speed, louder at higher revs up to a limit
    hum_db = -53 + 60 * np.log10(np.minimum(rate, 35) / 32) - 8 * load ** 4
    hum_db = hum_db + swells(HUM_SWELLS) + 1.5 * wander(5)
    hum = amp(hum_db) * np.sqrt(2) * np.sin(2 * np.pi * 4 * turns)

    knocks = sum(amp(db) * pulses(turns - place + .006 * wander(40), spread_db=1) for place, db in KNOCKS)
    # under load the combustion itself strikes the casing harder
    thrust = .45 + .25 * load
    blows = (evened(knocks) + thrust * evened(firing)) / np.hypot(1, thrust)
    struck = colour(blows + .55 * bursts(blows, decay_s=.009), peaks(CASING))
    ring = amp(ring_db) * wavering(struck, RING_DRIFT, RING_DRIFT_HZ)
    rattle = bursts(blows, decay_s=.004) + 1.5 * noise()
    clatter = amp(clatter_db) * colour(rattle, peaks(METAL) + shape(CLATTER_SPECTRUM))
    return pipes(firing, rate, exhaust_db, intake_db) + hum + ring + clatter


def scene():
    """All sources together, from the background to the rider's own engine."""
    background = track() + spray()
    far_bike = bike_ahead(FAR_REVS, FAR_BIKE, FAR_SILENCER, rough=.7)
    near_bike = bike_ahead(NEAR_REVS, NEAR_BIKE, NEAR_SILENCER, rough=.35)
    camera = cloth() + handling()
    own_bike = stones() + chain() + engine()
    return (background + far_bike + near_bike + camera + own_bike)[None]


OVERLOAD = 0.98  # level towards which a soft limiter holds the peaks
EDGE_HZ = 15300  # upper band limit


def record(dry):
    """A soft limiter keeps the hardest knocks in range; then a low-pass removes the highest treble."""
    soft = OVERLOAD * np.tanh(dry / OVERLOAD)
    low_pass = signal.firwin(511, EDGE_HZ, window=("kaiser", 9), fs=SR)
    return signal.oaconvolve(soft, low_pass[None], "same")


dry = scene()
out = record(dry)
transcribe(out)
```